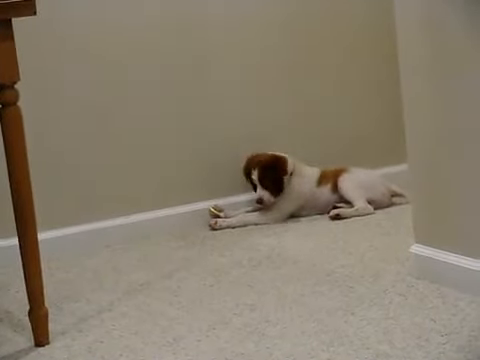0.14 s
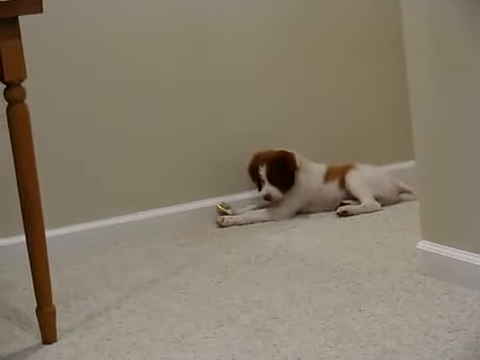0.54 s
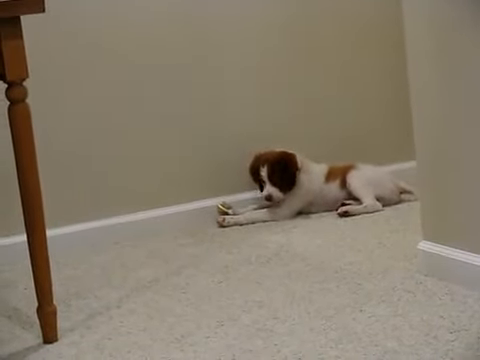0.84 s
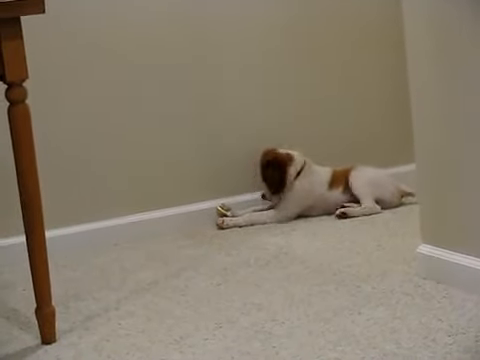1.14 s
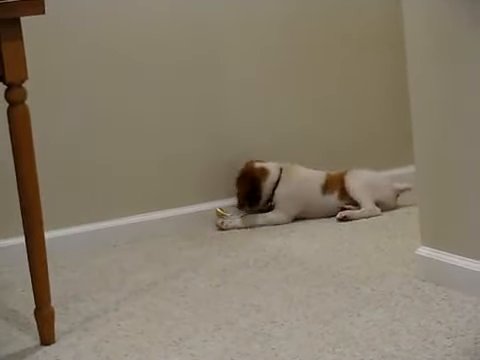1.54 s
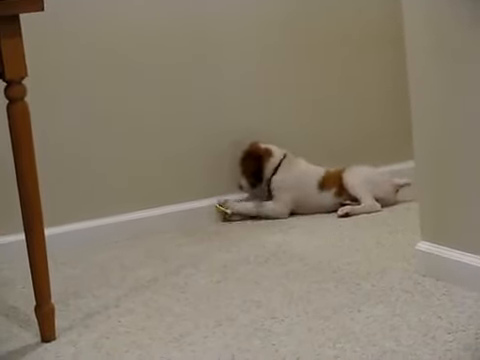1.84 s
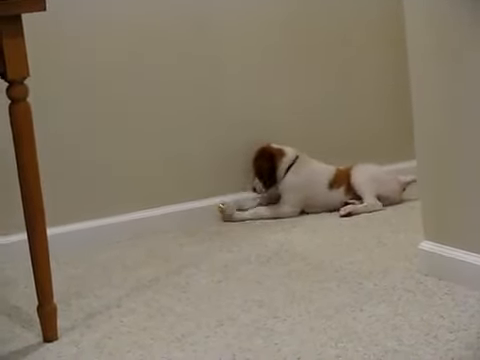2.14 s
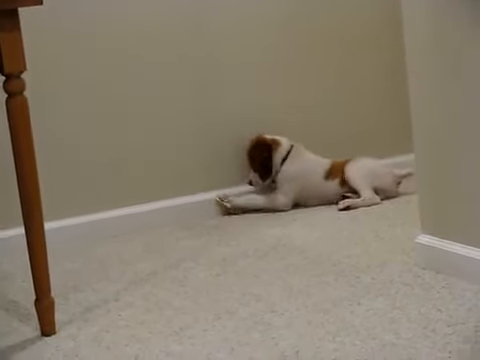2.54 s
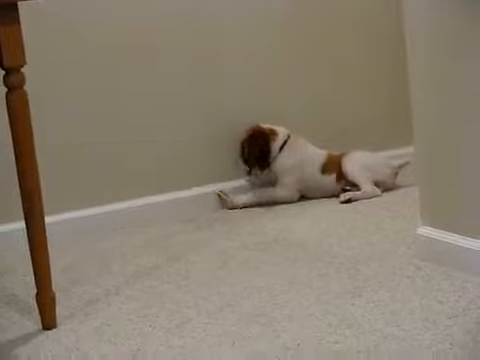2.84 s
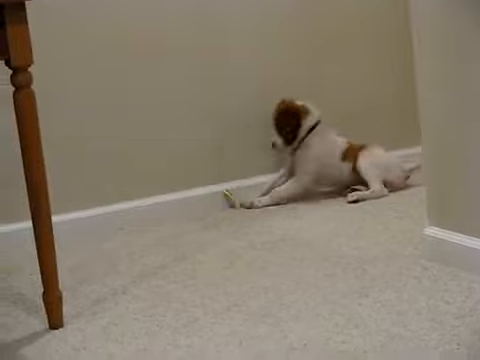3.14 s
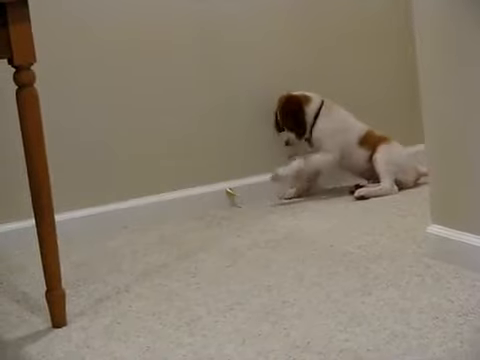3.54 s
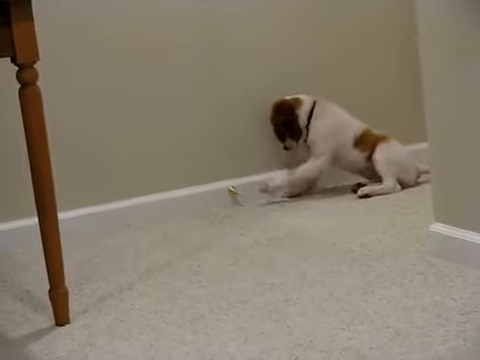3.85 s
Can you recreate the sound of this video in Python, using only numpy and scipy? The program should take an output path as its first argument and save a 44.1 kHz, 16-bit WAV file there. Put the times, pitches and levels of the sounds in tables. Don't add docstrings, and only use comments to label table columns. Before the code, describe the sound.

A springy metal door stop is pawed by a puppy. Camera hiss and faint whirr come first, with light brushing from 1.2 seconds. A weak twang starts near 1.7, then a loud, bright clattering rattle from 2.1 to 2.7. A short thin nudge follows at 2.8, then a buzzing twang from 3.1, fading past 3.6 with a dull knock and faint low groan. Short, soft room tail.

```python
import sys
import numpy as np
from scipy import signal
from scipy.fft import rfft, irfft
from scipy.io import wavfile
from scipy.ndimage import uniform_filter1d

SR = 44100
rng = np.random.default_rng(int(sys.argv[2]) if len(sys.argv) > 2 else 0)


def volts_from_decibels(level):
    exponent = np.asarray(level, float) / 20
    return 10 ** exponent


def wav_out(sig):
    wavfile.write(sys.argv[1], SR, np.round(np.clip(np.atleast_2d(sig).T, -1, 1) * 32767).astype(np.int16))


N = 176400

TOUCHES_PER_S, TOUCH_SPREAD_DB = 3000, 3.5


def band(x, hz, width):
    return signal.lfilter(*signal.iirpeak(hz, hz / width, SR), x)


def band_twice(x, hz, width):
    return unit(band(band(x, hz, width), hz, width))


def unit(x):
    return x / np.sqrt(np.mean(x ** 2))


def lowpass(x, order, hz):
    return signal.sosfilt(signal.butter(order, hz, fs=SR, output="sos"), x)


def walk(rate):
    k = int(SR / rate)
    steps = np.repeat(rng.standard_normal(N // k + 1), k)
    return unit(uniform_filter1d(uniform_filter1d(steps, k), k)[:N])


def clicks(rate, spread_db):
    chance, side = rng.random((2, N))
    size = volts_from_decibels(spread_db * np.clip(rng.standard_normal(N), -2, 2))
    return unit((chance < rate / SR) * np.sign(side - 0.5) * size)


def elsewhere(x):
    return x * np.sign(rng.standard_normal(N))


def bent(x):
    bend_s, bends_per_s = 0.00006, 30
    at = np.arange(N)
    return np.interp(at + bend_s * SR * walk(bends_per_s), at, x)


def damped(hz, ring_hz, col):
    # start in seconds, free coil ring in dB, 159 Hz board ring in dB.
    paw_hold = [
        (0, -8, 1),
        (2.05, -9, 0),
        (2.75, 0, 1.5),
        (3.05, -0.5, -2.5),
        (3.38, 1.5, -7.5),
    ]
    if abs(hz / ring_hz - 1) >= 0.03:
        return 1
    r = np.array(paw_hold)
    row = np.searchsorted(r[:, 0], np.arange(N) / SR, "right") - 1
    return volts_from_decibels(r[row, col])


def control(col, rest):
    # time in seconds, chatter in dB, board buzz in dB, share of the thin high ring 0-1.
    twangs = [
        [(1.73, -62, -68, 0), (1.738, -40.5, -47.5, 0.3), (1.752, -25.5, -30, 0.1), (1.786, -31, -31.5, 0.1),
         (1.854, -21.5, -33.5, 1), (1.866, -32, -34.5, 0.3), (1.926, -53, -47.5, 0.6), (2.0, -44, -45.5, 0.3),
         (2.1, -36, -57, 0.7)],
        [(2.12, -37, -66, 0.2), (2.138, -19, -46.5, 1), (2.176, -27, -46, 1), (2.198, -21, -35, 0.2),
         (2.272, -23.5, -36, 0), (2.32, -16.5, -30.5, 0.1), (2.378, -23.5, -27.5, 0.3),
         (2.592, -20.5, -30, 0.2), (2.78, -45, -53.5, 0.6)],
        [(3.03, -60, -79, 0.8), (3.05, -58.5, -43.5, 0), (3.102, -32, -58, 0.1), (3.112, -19.5, -35, 0),
         (3.204, -35, -33, 0.5), (3.218, -19.5, -37.5, 0), (3.56, -27.5, -33.5, 0), (3.836, -45, -44, 0.74),
         (3.97, -86, -66, 0.4)],
    ]
    # time in seconds, chatter in dB, board buzz in dB, thin share 0-1.
    nudge = [
        (2.785, -41, -62, 0.8),
        (2.793, -11, -42, 1),
        (2.835, -31.5, -46, 0.97),
        (2.949, -53, -59, 0.2),
        (2.967, -40.5, -43.5, 0.72),
        (3.03, -45, -78, 0.6),
    ]
    t, out = np.arange(N) / SR, np.full(N, float(rest))
    for rows in list(twangs) + [nudge]:
        r = np.array(rows)
        inside = (t >= r[0, 0]) & (t <= r[-1, 0])
        out[inside] = np.interp(t[inside], r[:, 0], r[:, col])
    return out


def coil(push, thin):
    # frequency in Hz, width in Hz, peak height in dB.
    low_modes = [(785, 760, -8.5), (1065, 55, -12), (1260, 270, -7), (1630, 206, -2.5), (1870, 41, -16.5),
                 (2140, 200, -5), (2290, 40, 4), (2550, 280, -7.5), (2820, 84, -24.5), (3203, 260, -0.5)]
    # frequency in Hz, width in Hz, peak height in dB.
    thin_modes = [(2300, 230, -6), (3300, 570, -5.5), (3850, 140, -17), (3850, 50, -1.5), (4050, 65, 1),
                  (4220, 85, 3), (4480, 70, -13)]
    sets = [(push * np.sqrt(1 - thin), low_modes, 2900, 3600, -1.5),
            (push * np.sqrt(thin), thin_modes, 4100, 1900, -4)]
    out = 0
    for part, modes, crack_hz, crack_width_hz, crack_db in sets:
        ring = 0
        for hz, width, db in modes:
            ring = ring + volts_from_decibels(db) * band(elsewhere(part) * damped(hz, 2290, col=1), hz, width)
        crack = band_twice(part, crack_hz, crack_width_hz)
        level = np.sqrt(np.mean(part ** 2))
        out = out + level * (bent(unit(ring)) + volts_from_decibels(crack_db) * crack)
    return lowpass(out, 5, 4800)


def slaps():
    # time in seconds, peak in dB, share of the thin high ring 0-1, length factor.
    early_slaps = [(1.7484, -21.5, 0.8, 0.32), (1.7731, -23, 0.8, 1.4), (1.8185, -21.5, 0.95, 1.8),
                   (1.8455, -26.5, 0.7, 2.8), (2.1352, -12.5, 1, 2.2), (2.1898, 0.5, 0.89, 0.66),
                   (2.2092, -2, 0.7, 0.49), (2.2343, -14.5, 0.55, 0.96), (2.2887, -7.5, 0.5, 0.66),
                   (2.315, -5.5, 0, 0.95), (2.3366, -11, 0.3, 3.4), (2.3582, -23, 0.12, 0.59),
                   (2.3828, -9, 0.1, 0.43), (2.4064, -13, 0.55, 1.2), (2.4462, -11.5, 0.68, 1.7),
                   (2.4881, -14, 0.3, 1.1), (2.5206, -8.5, 1, 0.84), (2.5996, -14.5, 0.3, 1.3),
                   (2.6244, -9, 0.9, 0.45), (2.6923, -23.5, 0.7, 2.2), (2.7894, -10, 0.98, 1.4)]
    # time in seconds, peak in dB, share of the thin high ring 0-1, length factor.
    late_slaps = [(2.964, -26.5, 0.27, 0.61), (3.1156, -8, 0.2, 0.77), (3.147, -4.5, 0.31, 1.46),
                  (3.182, -11.5, 0.12, 2.3), (3.2074, -8, 0.11, 1), (3.223, -15, 0.24, 0.57),
                  (3.247, -4, 0.16, 0.7), (3.2755, -1.5, 0.1, 1.1), (3.2982, -30, 0.6, 0.64),
                  (3.3293, -5.5, 0.41, 1.3), (3.3444, -28, 0.42, 1.2), (3.358, -30.5, 0.15, 1.1),
                  (3.3842, -11.5, 0.7, 1.2), (3.41, -13.5, 0.16, 0.76), (3.4356, -4.5, 0.66, 0.66),
                  (3.448, -18.5, 0.65, 1.8), (3.4803, -14, 0.15, 2.2), (3.5176, -18, 0.17, 2.1),
                  (3.5594, -22, 0.16, 0.45), (3.5894, -32, 0.12, 1.1), (3.628, -46, 0.48, 1.1)]
    rise_s, decay_s, slap_db, tick_db = 0.0034, 0.0098, -12, -22
    t, env, tick, thin = np.arange(N) / SR, np.zeros(N), np.zeros(N), np.zeros(N)
    for s, db, share, long in list(early_slaps) + list(late_slaps):
        d = np.maximum(t - s + rise_s, 0)
        env += volts_from_decibels(db + slap_db) * np.minimum(d / rise_s, 1) * np.exp(-d / (decay_s * long))
        tick += volts_from_decibels(db + tick_db) * np.minimum(d / 0.005, 1) * np.exp(-d / 0.0058)
        thin[d > 0] = share
    bright = unit(band(band(clicks(5000, 3.0), 5000, 2600), 4800, 2600))
    return coil(env * clicks(TOUCHES_PER_S, TOUCH_SPREAD_DB), thin) + tick * bright


def spots():
    # time in seconds, peak in dB, pitch in Hz.
    early_spots = [(1.7295, -38.5, 3620), (1.7517, -21.5, 4600), (1.774, -20.5, 4480), (1.8162, -28, 3200),
                   (1.8456, -21, 4000), (1.9379, -38.5, 3230), (2.0317, -46, 3420), (2.0555, -32.5, 3800),
                   (2.1349, -6, 4500), (2.1933, -8.5, 4440), (2.289, -11, 4170), (2.3108, -16.5, 3840),
                   (2.341, -20, 3130), (2.361, -24, 3330), (2.4061, -19.5, 4150), (2.4502, -19, 3590),
                   (2.4868, -17.5, 4320), (2.5234, -15.5, 3060), (2.5886, -20, 4400), (2.603, -22, 4400),
                   (2.6278, -29.5, 3930), (2.6947, -24, 3850)]
    # time in seconds, peak in dB, pitch in Hz.
    late_spots = [(2.7912, -7.5, 4540), (2.969, -28.5, 4270), (3.0454, -36, 3590), (3.0652, -34.5, 1430),
                  (3.0926, -21.5, 1650), (3.115, -11, 2390), (3.146, -15.5, 4480), (3.1819, -18, 2220),
                  (3.2103, -9, 2325), (3.244, -17, 2370), (3.2737, -10, 2290), (3.331, -18.5, 2325),
                  (3.385, -16, 3490), (3.413, -16.5, 3080), (3.432, -15.5, 2170), (3.477, -22.5, 2286),
                  (3.516, -19.5, 2330)]
    # time in seconds, peak in dB, pitch in
    # Hz.
    side_spots = [(1.42, -32, 4300), (1.49, -29.5, 4300), (1.752, -20.5, 1450), (2.2, -13, 2300),
                  (2.21, -10.5, 4300), (2.224, -23, 4060), (2.236, -18.5, 2180), (2.314, -9.5, 2280),
                  (2.431, -19, 4800), (2.604, -24, 1564), (3.117, -14.5, 4700), (3.15, -12.5, 5510),
                  (3.213, -8.5, 3300), (3.223, -8.5, 3900), (3.248, -11.5, 1616), (3.288, -14, 3240),
                  (3.304, -21.5, 3310), (3.329, -13.5, 4050), (3.343, -12.5, 3980), (3.36, -10, 3320)]
    spot_db, decay_s, width_hz, sag, sag_from_hz = -5, 0.0074, 230, 0.06, 3700
    out, touches = np.zeros(N), clicks(TOUCHES_PER_S, TOUCH_SPREAD_DB)
    d = np.arange(SR // 20) / SR
    fade = np.exp(-d / decay_s)
    for s, db, hz in list(early_spots) + list(late_spots) + list(side_spots):
        i = int((s - 0.002) * SR)
        x = touches[i:i + len(d)]
        late_hz = hz * (1 - sag * (hz > sag_from_hz))
        first = unit(band(band(x, hz, width_hz), hz, 2 * width_hz))
        late = unit(band(band(x, late_hz, width_hz), late_hz, 2 * width_hz))
        ring = fade * first + (1 - fade) * late
        out[i:i + len(d)] += volts_from_decibels(db + spot_db) * np.minimum(d / 0.004, 1) * fade * ring
    return out


def chatter():
    swing_hz, swing_db, touches_per_s, chatter_db = 35.2, -2.5, 2500, -9
    phase = np.cumsum(swing_hz * (1 + 0.15 * walk(7.4))) / SR
    gate = volts_from_decibels(swing_db * np.cos(2 * np.pi * phase) + 0.97 * walk(70))
    touches = unit(gate * clicks(touches_per_s, 1.3))
    rattle = coil(volts_from_decibels(control(1, -99) + chatter_db) * touches, control(3, 0))
    return lowpass(rattle, 2, 5000)


def groan():
    # time in seconds, pitch in Hz, level in dB.
    glide = [
        (3.64, 290, -60),
        (3.66, 335, -42),
        (3.69, 370, -43),
        (3.715, 324, -35),
        (3.74, 251, -39.5),
        (3.775, 192, -52),
    ]
    t, r = np.arange(N) / SR, np.array(glide)
    phase = np.cumsum(np.interp(t, r[:, 0], r[:, 1])) / SR
    return volts_from_decibels(np.interp(t, r[:, 0], r[:, 2], -99, -99)) * np.sin(2 * np.pi * phase)


def board():
    # frequency in Hz, width in Hz, peak height in dB.
    board_modes = [(105, 50, -24), (159, 14, -5), (237, 19, 1.5), (322, 36, -7), (400, 60, -11),
                   (535, 36, -9), (650, 100, -14), (770, 100, -12), (914, 40, -12), (1030, 60, -11)]
    buzz_hz, jitter, roughness = 79, 0.07, 1.05
    phase = np.cumsum(buzz_hz * (1 + jitter * walk(30))) / SR
    knocks = unit(np.diff(np.floor(phase), prepend=0) * volts_from_decibels(3.26 * walk(70)))
    knocks = knocks + roughness * clicks(700, 0.76)
    ring = 0
    for k, (hz, width, db) in enumerate(board_modes):
        ring = ring + (-1) ** k * volts_from_decibels(db) * band(knocks * damped(hz, 159, col=2), hz, width)
    return volts_from_decibels(control(2, -83) + 1.5) * unit(ring)


def thumps():
    # time in seconds, level in dB, pitch in Hz, width in seconds.
    blows = [
        (2.198, -40, 45, 0.0028),
        (2.318, -28.5, 45, 0.0024),
        (2.799, -31.5, 45, 0.0025),
        (2.969, -45, 456, 0.0082),
        (3.122, -35, 45, 0.0036),
        (3.156, -35, 44.7, 0.0044),
        (3.218, -37.5, 45, 0.0045),
        (3.629, -26.5, 310, 0.0098),
    ]
    t, out = np.arange(N) / SR, np.zeros(N)
    for s, db, hz, width in blows:
        out += volts_from_decibels(db) * np.exp(-((t - s) / width) ** 2) * np.cos(2 * np.pi * hz * (t - s))
    return out


def brush():
    # time in seconds, level in dB.
    strokes = [(1.2, -59.5), (1.37, -52.5), (1.42, -49.5), (1.46, -51), (1.5, -49.5), (1.56, -53.5),
               (1.6, -46.5), (1.72, -54.5), (1.9, -53.5), (2.101, -60.5), (2.749, -58.5), (2.9, -55.5),
               (3.099, -50.5), (3.75, -48.5), (3.9, -86), (4, -85.5)]
    t, r = np.arange(N) / SR, np.array(strokes)
    low = 1.39 * unit(band(clicks(900, 1.2), 500, 440))
    middle = 0.45 * unit(band(clicks(1500, 4.5), 1600, 1000))
    dull = np.clip((t - 1.5) / 0.19, 0.3, 1) * (low + middle)
    fine = unit(band(band(clicks(3800, 4.3), 3830, 980), 2730, 1700))
    return volts_from_decibels(np.interp(t, r[:, 0], r[:, 1]) + 3.0 * walk(24.73)) * (fine + dull)


def floor():
    # frequency in Hz, density in dB per Hz.
    hiss_shape = [(32, -7), (90, -0.5), (300, -5), (500, -7), (2300, -9), (3900, -7.5), (5200, -14.5),
                  (6800, -49)]
    # frequency in Hz, width in Hz, level in dB.
    whirr_rings = [(608, 95, -15), (3250, 200, -13), (3680, 70, -8), (4520, 280, -8)]
    floor_db, flicker_db, flicker_per_s = -50, 1.5, 20
    f, r = np.maximum(np.fft.rfftfreq(N, 1 / SR), 1), np.array(hiss_shape)
    shape = volts_from_decibels(np.interp(np.log(f), np.log(r[:, 0]), r[:, 1])) * (f < 7500)
    hiss = unit(irfft(rfft(rng.standard_normal(N)) * shape, N))
    whirr = 0
    for hz, width, db in whirr_rings:
        ring = unit(band(rng.standard_normal(N), hz, width))
        whirr = whirr + volts_from_decibels(db + flicker_db * walk(flicker_per_s)) * ring
    return volts_from_decibels(floor_db + 0.44 * walk(21.0)) * (hiss + whirr)


def room(near):
    t60_s, room_db = 0.34, -4.5
    d = np.arange(int(0.4 * SR)) / SR
    tail = rng.standard_normal(len(d)) * volts_from_decibels(-60 * d / t60_s) * (d > 0.004)
    wet = bent(signal.fftconvolve(near, tail / np.sqrt(np.sum(tail ** 2)))[:N])
    return volts_from_decibels(room_db) * lowpass(wet, 3, 4600)


def scene():
    near = slaps() + spots() + chatter() + brush()
    return (near + room(near) + groan() + board() + thumps() + floor())[None]


def low_pass(x):
    return signal.sosfilt(signal.butter(12, 7190, fs=SR, output="sos"), x)


def record(dry):
    clip, top_hz, offset = 0.4, 6250, -0.0065
    soft = clip * np.tanh(dry / clip)
    x = signal.sosfilt(signal.cheby1(6, 1, top_hz, fs=SR, output="sos"), soft) + offset
    return low_pass(x)


dry = scene()
out = record(dry)
wav_out(out)
```